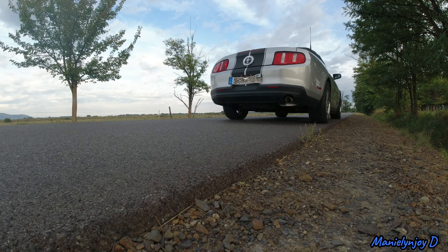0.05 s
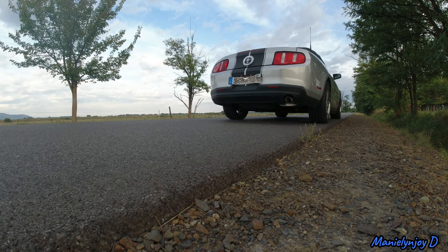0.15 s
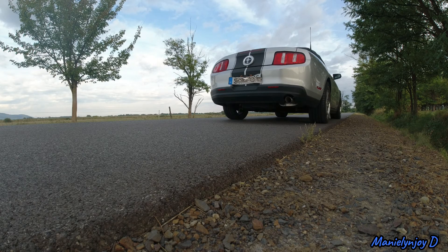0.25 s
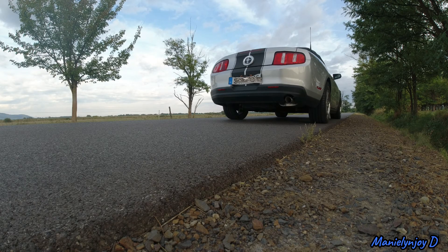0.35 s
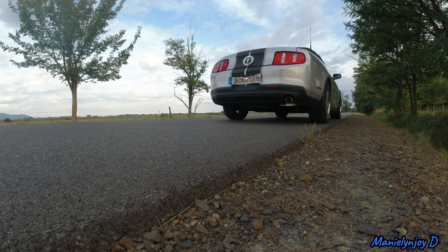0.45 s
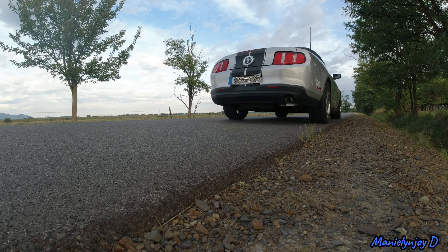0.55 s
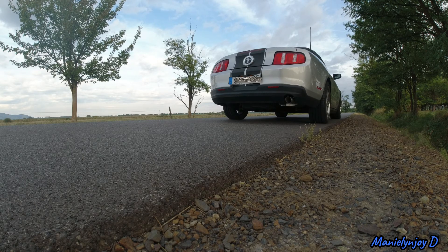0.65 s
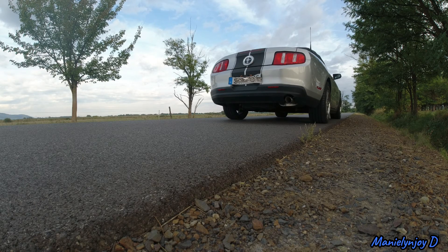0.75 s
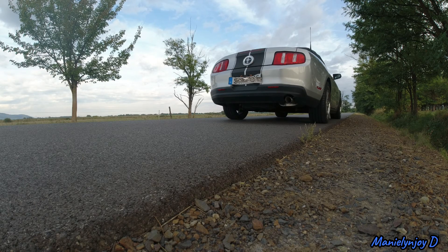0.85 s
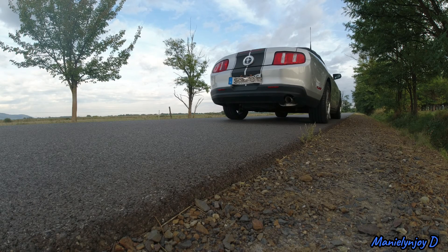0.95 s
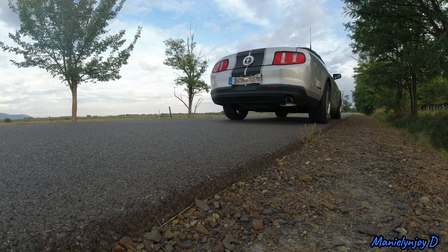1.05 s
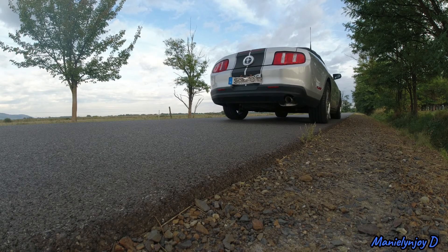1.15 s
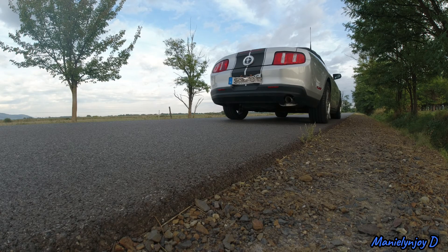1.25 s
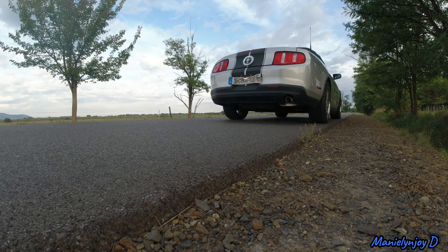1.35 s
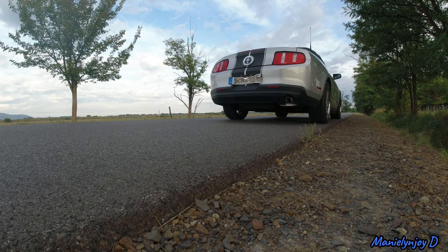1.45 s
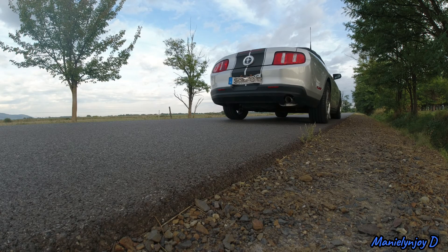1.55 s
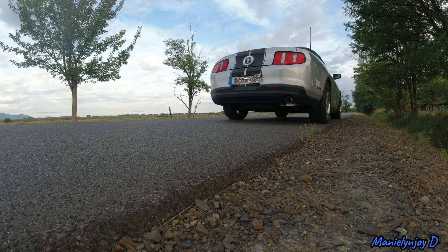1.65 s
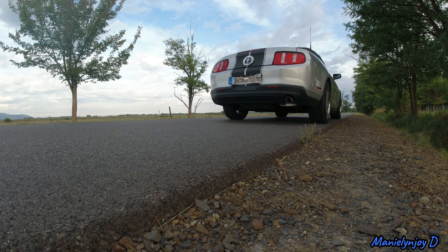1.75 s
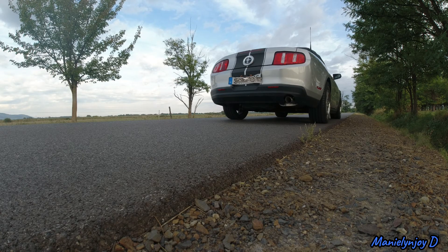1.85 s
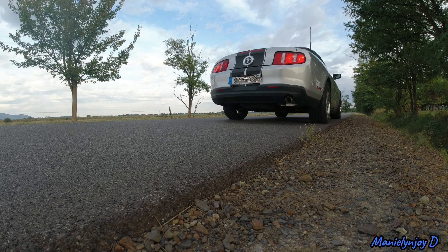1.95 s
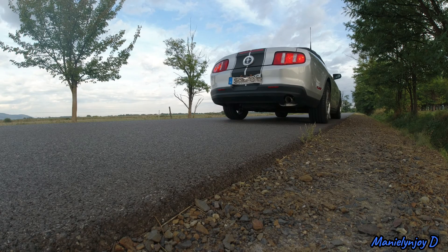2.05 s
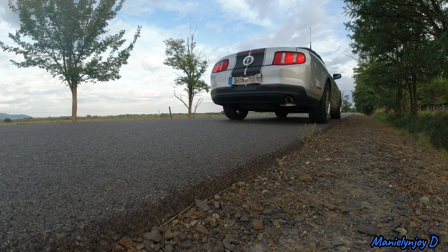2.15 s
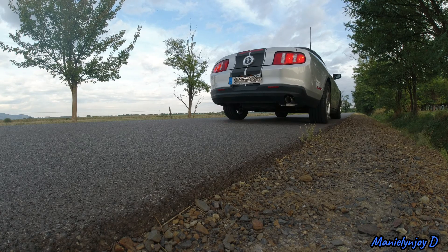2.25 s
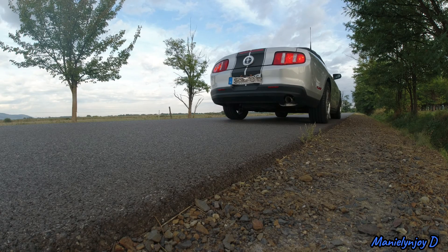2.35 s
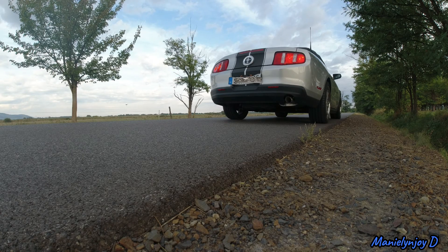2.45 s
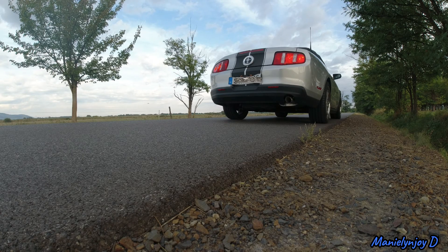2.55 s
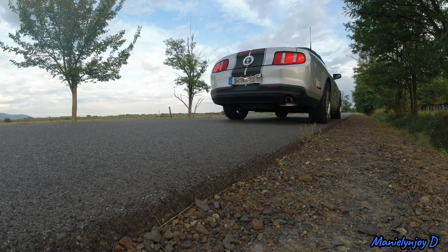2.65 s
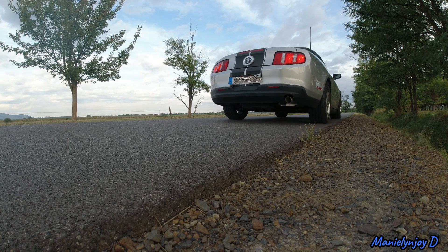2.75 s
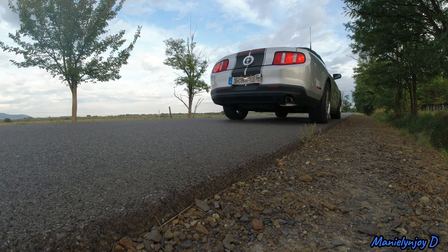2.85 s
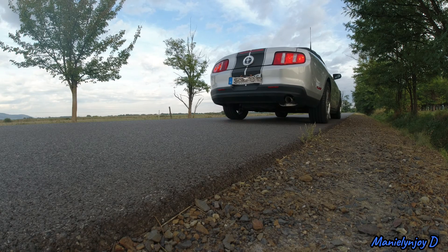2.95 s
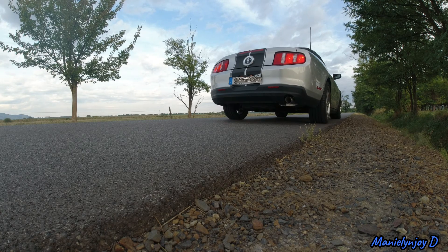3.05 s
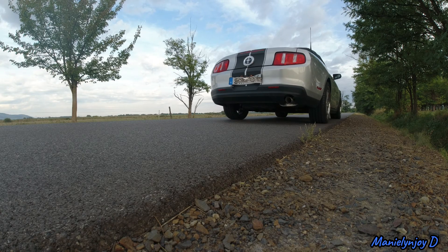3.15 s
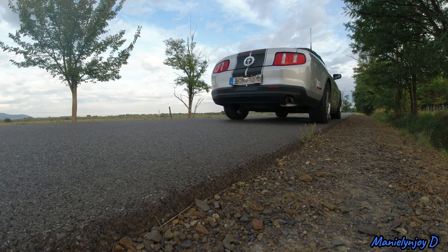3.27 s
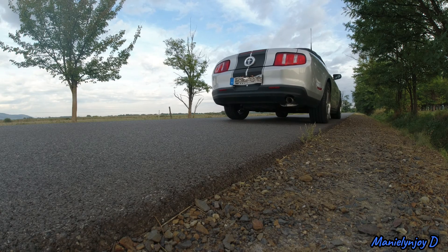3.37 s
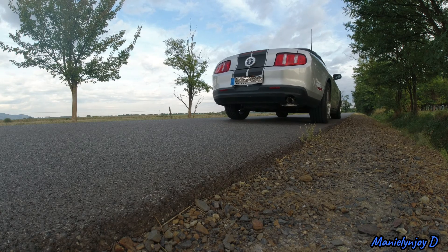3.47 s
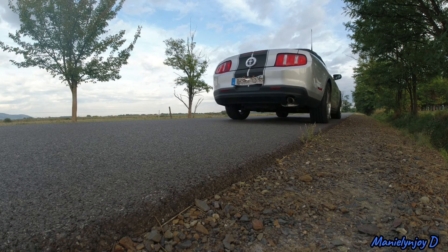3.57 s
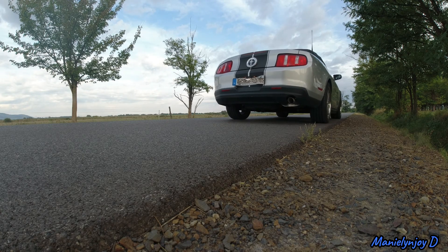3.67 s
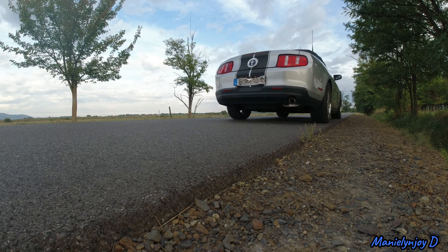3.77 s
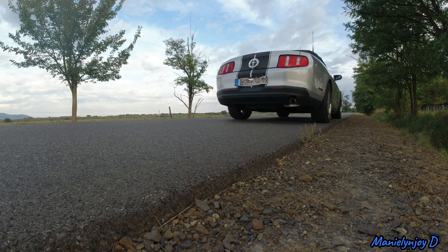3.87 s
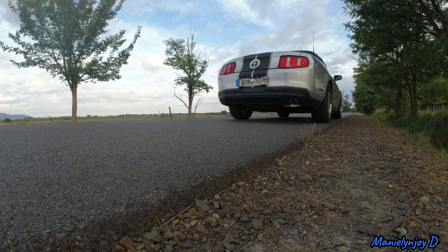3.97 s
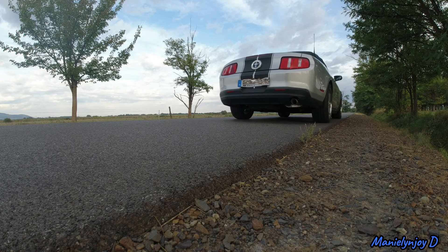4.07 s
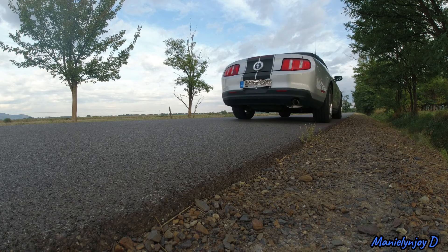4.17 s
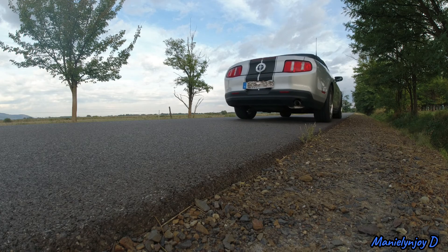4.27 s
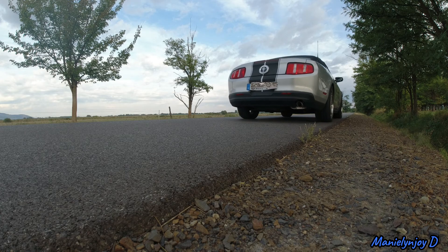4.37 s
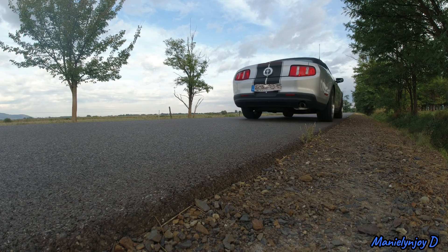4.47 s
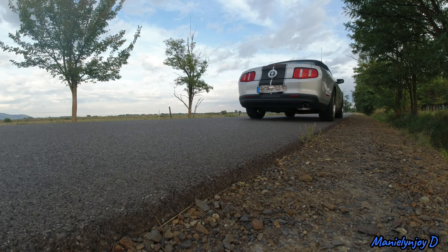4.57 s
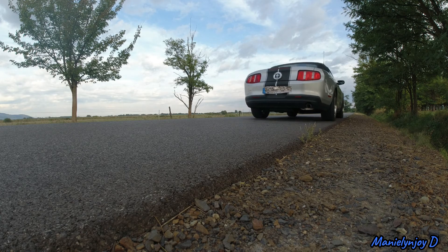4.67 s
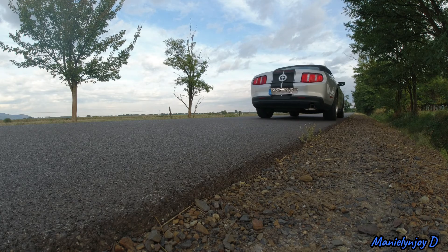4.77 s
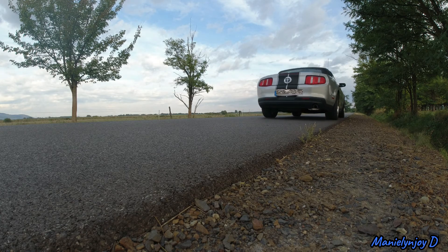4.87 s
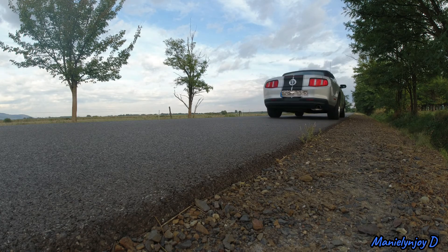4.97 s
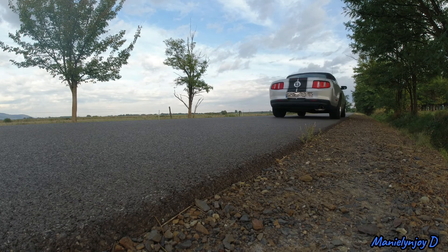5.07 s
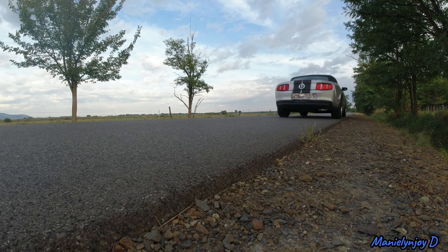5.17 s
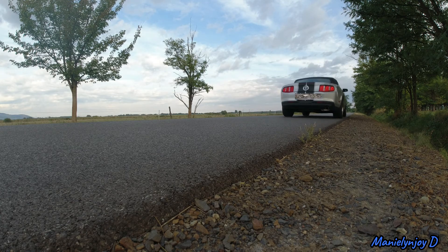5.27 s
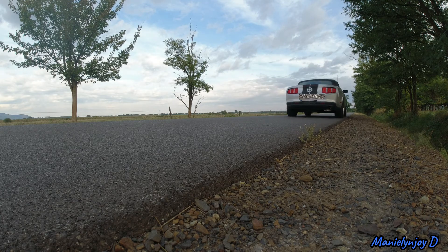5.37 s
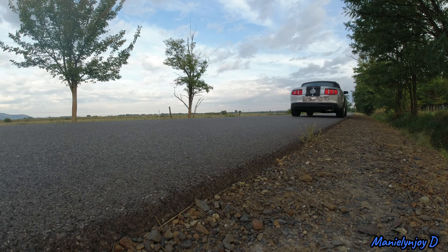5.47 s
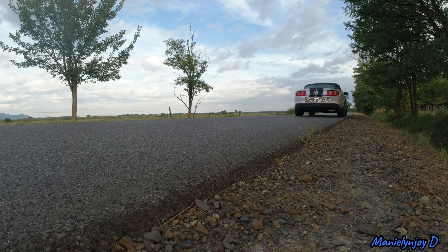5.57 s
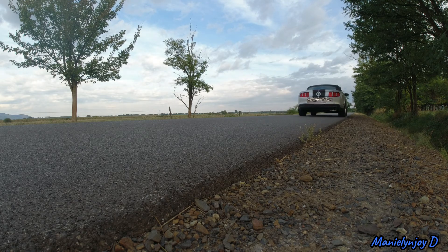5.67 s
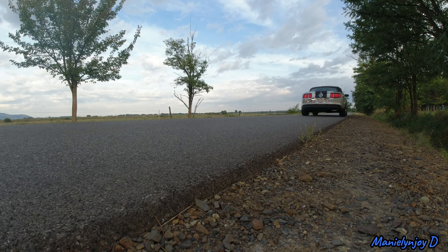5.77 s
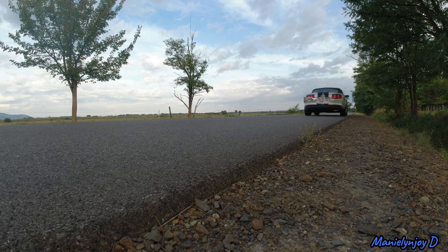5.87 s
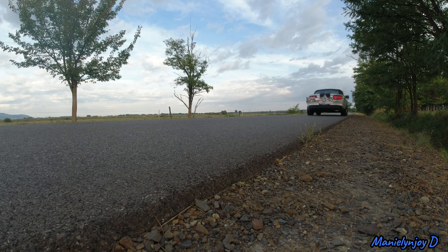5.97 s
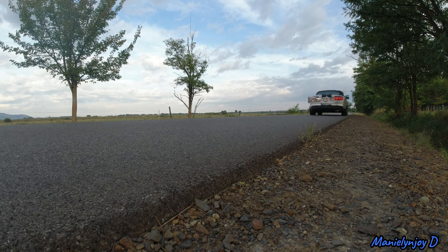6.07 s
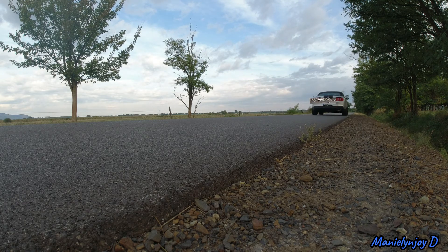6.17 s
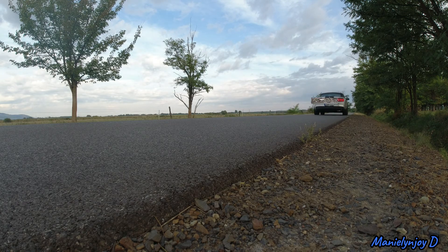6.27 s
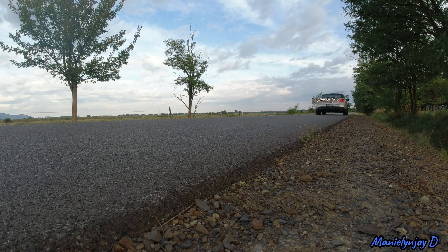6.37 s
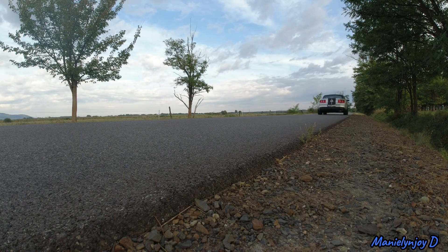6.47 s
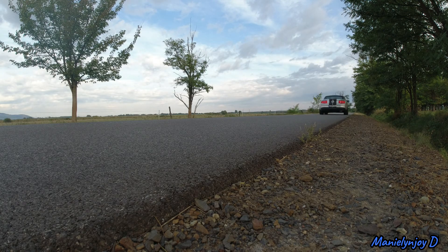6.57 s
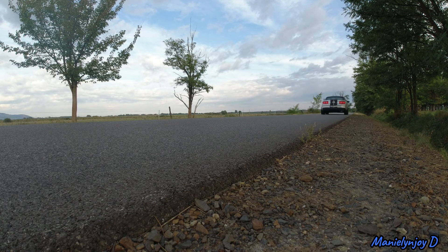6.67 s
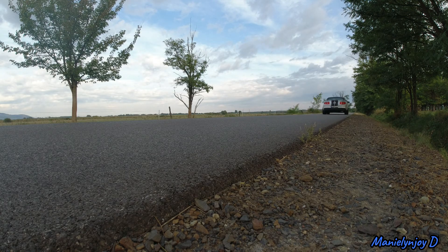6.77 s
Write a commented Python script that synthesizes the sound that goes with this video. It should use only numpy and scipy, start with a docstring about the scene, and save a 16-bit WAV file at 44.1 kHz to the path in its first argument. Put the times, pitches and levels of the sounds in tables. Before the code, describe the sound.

A car with an open exhaust winds down from high revs with sharp pops and a burble, close by on a quiet country road. It idles softly with a light clatter, a tick and a faint fan rush, then knocks into gear. Suddenly the throttle opens and the car drives away from the microphone, its loud drone rising in pitch and slowly fading over a light hiss of tyres on grit.

```python
"""A six-cylinder car with an open exhaust, from the roadside 4 m behind it, on two close microphone ports.
First the engine falls from a rev, its firings droning and rasping while unburnt fuel pops in the pipe.
At 2 s it settles to a clattering idle and a relay starts the cooling fan; at 3 s it clunks into gear.
At 4 s the throttle opens and it pulls away hard, tyres hissing and crunching over grit.
A treble rustle, short scrapes and two thin squeals come and go over faint outdoor air."""
import sys
import numpy as np
from scipy import signal
from scipy.io import wavfile
from scipy.ndimage import uniform_filter1d

SR = 44100
rng = np.random.default_rng(int(sys.argv[2]) if len(sys.argv) > 2 else 0)


def master_out(mix):
    """Clip the mix to full scale and print it as 16-bit PCM to the path in sys.argv[1]."""
    frames = np.transpose(np.atleast_2d(mix))
    ceiling = np.clip(frames, -1, 1)
    pcm = np.round(ceiling * 32767).astype(np.int16)
    wavfile.write(sys.argv[1], SR, pcm)


N = 301203
TIME = np.arange(N) / SR


def gain_of(db):
    """Decibels to a factor."""
    return 10 ** (np.asarray(db) / 20)


def unit_rms(x):
    """Scales to rms 1."""
    return x / np.sqrt(np.mean(x ** 2) + 1e-20)


def over_time(rows):
    """One curve for each column after the time."""
    times, *columns = np.transpose(rows)
    return [np.interp(TIME, times, column) for column in columns]


def at_hz(points, hz):
    """Reads a spectrum on a log-frequency axis."""
    f, value = np.transpose(points)
    return np.interp(np.log(hz + 1), np.log(f + 1), value)


def coloured(x, points, size=8192):
    """Causal filter: the phase follows from the log gain, so clicks keep a sharp front."""
    db = np.maximum(at_hz(points, abs(np.fft.fftfreq(size, 1 / SR))), -100)
    response = np.exp(np.conj(signal.hilbert(np.log(gain_of(db)))))
    taps = np.fft.ifft(response).real[:size // 2]
    return signal.oaconvolve(x, taps)[:len(x)]


def levelled(x, seconds):
    """Divides out the slow level, so that a curve can set it."""
    return x / np.sqrt(uniform_filter1d(x ** 2, round(seconds * SR)) + 1e-20)


def drift(seconds):
    """A smooth random wander of rms 1."""
    size = round(seconds * SR)
    return unit_rms(uniform_filter1d(uniform_filter1d(rng.standard_normal(N), size), size))


def decaying(hits, seconds):
    """Gives each impulse an exponential tail."""
    return signal.lfilter([1], [1, -np.exp(-1 / (seconds * SR))], hits)


def placed(rows, sound):
    """Lays one sound at each (time [s], level [dB])."""
    hits = np.zeros(N)
    for s, db in rows:
        hits[round(s * SR)] = gain_of(db)
    return signal.oaconvolve(hits, sound)[:N]


def ring(modes, seconds):
    """Dying sines, one for each mode."""
    t = np.arange(round(seconds * SR)) / SR
    return sum(gain_of(db - 60 * t / t60) * np.sin(2 * np.pi * hz * t) for hz, db, t60 in modes)


# nulls behind the two tailpipes: (multiple [x firing rate], firing rate [Hz], width [Hz])
PIPE_NULLS = [(2, 127, 5), (3, 71, 6), (3, 123, 5), (4, 68, 10), (4, 99, 9), (5, 126, 4), (6, 126, 4)]

def tailpipes(multiple, rate):
    """Signed share left of a tone: the two pipes cancel it at some engine speeds and turn it over."""
    share = np.ones(N)
    for k, null_hz, width in PIPE_NULLS:
        if k == multiple:
            share *= np.tanh((rate - null_hz) / width) * np.sign(110 - null_hz)  # upright at 110 Hz
    return share


# the exhaust's tones, one entry each: (multiple [x firing rate]); their delay in the pipe: (lag [rad])
TONE_MULTIPLES = [.5, 1, 1.5, 2, 2.5, 3, 4, 5, 6, 7]
TONE_LAGS = [.4, -.4, 1.3, 2.3, 2.2, 2.5, 3.2, 5.1, 6.5, 7.9]
# each tone entering the pipe on overrun, at idle and under load: (level [dB])
TONES_OVERRUN = [3, 0.5, -10, -1, -13, -20.5, -34, -37.5, -44, -36]
TONES_IDLE = [7, 5, -9, 5, -10, 6.4, -2, -9, -17, -0.5]
TONES_LOADED = [-17.5, 2.24, -32.5, -4, -19, -8.5, -24, -22, -31.5, -32]
# what the pipe passes of a steady tone: (frequency [Hz], gain [dB])
PIPE_RESPONSE = [(25, -34), (40, -15), (55, -9), (70, -6), (85, -3.3), (110, -2.1), (160, 1.5), (190, -4.5),
                 (220, -7), (265, -8), (300, -12), (328, -3), (400, -6), (440, -2), (530, -2.5), (700, -3),
                 (1000, -21.5)]

def drone(rate, cycles, load, turbulence, drone_db, rasp_db, idle_hz=38.8, overrun_hz=82):
    """Regular firings sound multiples of their rate through the pipe; turbulence makes each waver."""
    coasting = np.clip(np.log(rate / idle_hz) / np.log(overrun_hz / idle_hz), 0, 1)  # 0: fuel is back
    flow = np.maximum(load, coasting)  # at idle the pipes barely meet
    bright_db = .5 * (rasp_db - drone_db + 6.5)  # tones above 213 Hz follow the rasp as it stands out
    out = np.zeros(N)
    for k, lag, overrun, idle, loaded in zip(TONE_MULTIPLES, TONE_LAGS,
                                             TONES_OVERRUN, TONES_IDLE, TONES_LOADED):
        source_db = load * loaded + (1 - load) * (coasting * overrun + (1 - coasting) * idle)
        db = drone_db + source_db + at_hz(PIPE_RESPONSE, k * rate)
        db += bright_db * np.clip(np.log2(k * rate / 213), 0, 1)
        db += 2 * turbulence * drift(.017)
        share = 1 - flow + flow * tailpipes(k, rate)
        out += np.sqrt(2) * gain_of(db) * share * np.cos(2 * np.pi * k * cycles - lag)
    return out


# how much stronger or weaker each cylinder fires: (departure [share])
CYLINDER_BIAS = [0.85, 0.18, 0.76, -0.47, 0.52, 0.31]
# firings from overrun through idle to load: (time [s], even part, pattern, chance, turbulence [relative])
FIRING_CHARACTER = [(0, 0, .6, .9, .7), (1.2, 0, .5, .6, .7), (2, -.45, .2, .45, 1.1),
                    (3.9, -.45, .2, .45, 1.1), (4.3, 0, .7, .25, .3), (4.75, 0, .8, .25, .35),
                    (5.1, 0, 1.1, .18, .35), (6.4, 0, 1.0, .15, .35), (6.55, 0, 1.0, .15, .22),
                    (6.83, 0, 1.0, .15, .22)]

def firings(cycles, scatter_s=.0005):
    """No two cylinders fire alike: gives their uneven pulses, their sharp fronts and the turbulence."""
    even, patterned, luck, turbulence = over_time(FIRING_CHARACTER)
    fired = 1 + np.flatnonzero(np.diff(np.floor(cycles)))
    cylinder = np.floor(cycles[fired]).astype(int) % len(CYLINDER_BIAS)
    pattern = patterned[fired] * np.array(CYLINDER_BIAS)[cylinder]
    size_luck, front_luck, time_luck = luck[fired] * np.clip(rng.standard_normal((len(fired), 3)), -2, 2).T
    pulses, fronts = np.zeros((2, N))
    pulses[fired] = even[fired] + pattern + size_luck  # the even part is a short suck at idle
    # fronts leave the pipes a little early or late, which blurs the upper multiples
    delay = np.round(scatter_s * SR * (time_luck + pattern / 3)).astype(int)
    fronts[np.clip(fired + delay, 0, N - 1)] = gain_of(13 * pattern + 7.5 * front_luck)
    return pulses, fronts, turbulence


# uneven firings at the pipe mouth: (frequency [Hz], gain [dB])
BURBLE_COLOUR = [(20, -31.5), (45, -9), (70, -5.5), (110, 2.5), (150, 4), (200, 2), (260, 0), (330, -8),
                 (420, -22), (700, -50.5), (1500, -100)]

def burble(pulses, turbulence):
    """Uneven pulses boom in the pipe; swirling gas fills the gaps."""
    swirl = .6 * turbulence * rng.standard_normal(N)
    return levelled(coloured(levelled(pulses, .2) + swirl, BURBLE_COLOUR), .3)


# the firings' fronts at the pipe mouth: (frequency [Hz], gain [dB])
RASP_COLOUR = [(80, -41), (160, 9.5), (250, 6.5), (340, 1), (420, 1), (550, -4.5), (700, -7.5), (950, -22),
               (1500, -27), (2300, -50.5), (5000, -100)]

def rasp(fronts, turbulence):
    """Sharp pressure fronts bark out of the open pipe amid swirling gas."""
    swirl = turbulence * rng.standard_normal(N)
    return levelled(coloured(levelled(fronts, .2) + swirl, RASP_COLOUR), .3)


# valves and intake from behind the car, then with open throttle and tyres: (frequency [Hz], gain [dB])
CLATTER_COLOUR = [(250, -29.5), (500, -1.5), (900, -3.5), (1300, -7), (1750, -10), (2100, -14),
                  (2500, -15.5), (2900, -15.5), (3300, -19.5), (5200, -27.5), (6000, -33), (8500, -38),
                  (15500, -50)]
DRIVING_COLOUR = [(250, -30.5), (500, -0.5), (900, -3), (1500, -4.5), (2000, -12.5), (2600, -15.5),
                  (3800, -22), (5200, -25.5), (8500, -38), (15500, -53)]

def clatter(rate, load, fronts, turbulence, moves_s=3.625, start_m=4.06, pull_m_per_s2=3.46):
    """Valve, intake and road hiss throbs with the firings, grows with revs and fades with distance."""
    metres = start_m + .5 * pull_m_per_s2 * np.maximum(TIME - moves_s, 0) ** 2
    db = -49.5 + 11.5 * np.log2(rate / 100) + 8.5 * load - 20 * np.log10(metres / start_m)
    puffs = levelled(decaying(fronts, .0047), .84)
    throb = .8 + .2 * puffs / (1 + turbulence)
    rattle = throb * rng.standard_normal(N)
    hiss = (1 - load) * coloured(rattle, CLATTER_COLOUR) + load * coloured(rattle, DRIVING_COLOUR)
    return levelled(hiss, .49) * gain_of(db + 1.2 * drift(.035))


# the exhaust from the roadside: (time [s], drone gain [dB], burble gain [dB], rasp gain [dB])
EXHAUST_GAINS = [(0.0, -13.5, -37, -33), (0.12, -21.5, -23, -55), (0.24, -23.5, -21, -34),
                 (0.45, -28.5, -20.5, -34), (0.65, -27.5, -23.5, -37), (0.8, -27, -27, -38),
                 (0.949, -30, -28.5, -47.5), (1.099, -28, -38, -48), (1.321, -34, -40.5, -67),
                 (1.6, -37, -42.5, -70), (1.92, -49, -52.5, -77), (2.05, -50.5, -60, -50.5),
                 (3.0, -50.5, -54.5, -47.5), (3.962, -54, -43.5, -49.5), (3.989, -19, -33, -41.5),
                 (4.018, -11, -56, -45), (4.202, -12.5, -25, -38.5), (4.351, -13.5, -28.5, -33),
                 (4.401, -10, -28.5, -22), (4.52, -9, -23, -23), (4.7, -11.5, -21, -24),
                 (5.03, -13.5, -23.5, -26.5), (5.45, -15.5, -29, -27.5), (5.73, -19, -25, -28.5),
                 (6.0, -21, -27, -34), (6.431, -23.5, -26, -31), (6.56, -23.5, -25.5, -26.5),
                 (6.83, -24, -27, -26)]
# engine speed: (time [s], firing rate [Hz])
FIRING_RATE = [(0.0, 162.0), (0.12, 152.5), (0.24, 139.5), (0.6, 111.8), (0.72, 105.0), (0.84, 93.5),
               (1.08, 77.2), (1.32, 62.8), (1.56, 52.1), (1.92, 40.2), (2.1, 35.4), (2.4, 33.0),
               (3.94, 33.5), (4.02, 38.4), (4.23, 61.3), (4.44, 90.1), (4.51, 95.8), (4.58, 98.5),
               (4.66, 100.6), (4.9, 100.7), (5.03, 101.9), (5.31, 107.0), (6.01, 115.5), (6.29, 120.7),
               (6.43, 124.4), (6.57, 131.1), (6.71, 134.4), (6.83, 136.8)]

def engine(throttle_s=3.972, opening_s=.03):
    """One train of firings drives the drone, burble, rasp and clatter."""
    drone_db, burble_db, rasp_db = over_time(EXHAUST_GAINS)
    rate, = over_time(FIRING_RATE)
    load = np.clip((TIME - throttle_s) / opening_s, 0, 1)
    cycles = np.cumsum(rate) / SR
    cycles -= cycles[round(5.195 * SR)]  # the first cylinder fires at this moment
    pulses, fronts, turbulence = firings(cycles)
    return (drone(rate, cycles, load, turbulence, drone_db, rasp_db)
            + gain_of(burble_db - 2.5) * burble(pulses, turbulence)
            + gain_of(rasp_db) * rasp(fronts, turbulence)
            + clatter(rate, load, fronts, turbulence))


# pops at the tailpipe as the revs fall: (time of crest [s], peak level [dB])
FUEL_POPS = [(.0045, -8), (.0169, -7), (.0885, -14), (.1338, -1), (.146, -7), (.1955, -5), (.2083, -3.5),
             (.245, -10), (.29, -17), (.387, -7), (.402, -14), (.463, -18), (.726, -15), (.812, -23)]
# the pipe's ring after a pop: (frequency [Hz], level [dB], t60 [s])
PIPE_MODES = [(164, -18, 0.032), (86.4, -15, 0.095), (220, -15.5, 0.054)]

def pops(rise_s=.00145):
    """Unburnt fuel goes off in the pipe: a rounded push, a steep fall into a longer pull, then a ring."""
    age = np.arange(SR // 8) / SR / rise_s
    age = np.where(age < 1, age, 1 + 1.3 * (age - 1))  # falls faster than it rises
    late = 1 - np.exp(-(age / 2) ** 4)
    push = np.sin(np.pi * np.minimum(age, 2) / 2) ** 4
    pull = .5 * np.exp(-((age - 2.6) / 2.1) ** 2)
    mouth = signal.butter(2, 55.6, "high", fs=SR)  # the pipe mouth sheds little bass
    pop = signal.lfilter(*mouth, push + late * (ring(PIPE_MODES, 1 / 8) - pull))
    return placed([(s - rise_s, db) for s, db in FUEL_POPS], pop / pop.max())


# gusts of airy rustle: (time [s], length [s], level [dB]); their colour: (frequency [Hz], gain [dB])
RUSTLE_GUSTS = [(0.0, 0.36, -63), (0.252, .2, -60), (0.39, 0.3, -57), (0.532, 0.26, -55.5),
                (0.723, 0.22, -56.5), (0.836, 0.27, -69.5), (4.12, 0.81, -64.5), (4.561, 0.28, -66.5),
                (4.65, .8, -66), (5.101, 0.89, -72)]
RUSTLE_SPECTRUM = [(2500, -26.5), (4000, -3), (5200, 3.5), (7000, -1), (10000, 1), (11800, -1.5),
                   (12500, -16), (14000, -19), (15500, -24.5)]

def rustle():
    """A thin treble hiss that flickers and comes in gusts."""
    hiss = gain_of(2.5 * drift(.004)) * rng.standard_normal(N)
    power = sum(placed([(s, db)], signal.windows.tukey(round(length * SR), .8)) ** 2
                for s, length, db in RUSTLE_GUSTS)
    return np.sqrt(power) * unit_rms(coloured(hiss, RUSTLE_SPECTRUM))


# open air at the roadside: (frequency [Hz], gain [dB])
AIR_COLOUR = [(30, 16), (60, 3), (100, -26), (400, -1.5), (900, -3), (1600, -13), (2600, -19), (4500, -32),
              (6000, -45), (8500, -36), (12500, -54.5), (15500, -44)]

def air(level_db=-60.5):
    """Faint outdoor rumble and hiss, wavering slightly."""
    return gain_of(level_db + drift(.028)) * unit_rms(coloured(rng.standard_normal(N), AIR_COLOUR))


# short scrapes from the car's direction: (time [s], length [s], level [dB], centre [Hz], width [Hz])
SCRAPE_EVENTS = [(.485, 0.08, -43, 900, 700), (2.945, 0.075, -60, 3600, 1200),
                 (2.975, 0.075, -50, 450, 600), (2.28, .06, -63, 2200, 3000), (3.25, .06, -64, 2000, 2600)]

def scrapes():
    """Rough noise in one broad resonance, swelling and fading."""
    out = np.zeros(N)
    for s, length, db, hz, width in SCRAPE_EVENTS:
        size = round(length * SR)
        band = signal.butter(2, [hz - width / 2, hz + width / 2], "band", fs=SR)
        rough = rng.standard_normal(SR) * gain_of(2.9 * drift(.00067)[:SR])
        scrape = unit_rms(signal.lfilter(*band, rough)[:size])
        out += placed([(s, db)], scrape * signal.windows.tukey(size, .7))
    return out


# the fan relay, heard as the car idles: (time [s], gain [dB])
RELAY_TICK = [(2.009, -38.5)]

def cooling_fan(rush_db=-57.5):
    """A relay ticks drily and the fan comes on with a steady rush."""
    tick = ring([(600, -5, .0091), (1170, -5, .011), (2500, -6.5, .0028),
                 (5000, -3, .0012), (9000, -16, .002)], .02)
    running = TIME > RELAY_TICK[0][0]
    rush = unit_rms(coloured(rng.standard_normal(N), CLATTER_COLOUR))
    return placed(RELAY_TICK, tick) + gain_of(rush_db) * rush * running


# squeals, barely audible at the roadside: (time [s], length [s], level [dB], frequency [Hz])
SQUEAL_EVENTS = [(2.53, .97, -84, 5360), (4.05, .13, -74, 5860)]

def squeals():
    """Thin tones, as of brakes, that waver in strength."""
    out = np.zeros(N)
    for s, length, db, hz in SQUEAL_EVENTS:
        t = np.arange(round(length * SR)) / SR
        out += placed([(s, db)], np.sin(2 * np.pi * hz * t) * signal.windows.tukey(len(t), .3))
    return np.sqrt(2) * out * gain_of(2 * drift(.03))


# the gear going in, a few metres off: (time [s], peak level [dB])
SHIFT_KNOCKS = [(2.957, -47), (2.979, -33), (2.987, -42), (3.001, -47), (3.013, -48)]
# the gearbox's ring: (frequency [Hz], level [dB], t60 [s])
GEARBOX_MODES = [(543, 6, 0.28), (802, 13, 0.078), (1230, -19, 0.045), (1714, 9, 0.04), (2140, 6, 0.044),
                 (3330, -1.5, 0.14), (3910, 0, 0.033)]

def gear_shift(blow_s=.00033):
    """Short knocks ring the gearbox; each blow takes a moment to build."""
    body = ring(GEARBOX_MODES, .1)
    body *= 1 - np.exp(-TIME[:len(body)] / blow_s)
    return placed(SHIFT_KNOCKS, body / abs(body).max())


# road grit as the car leaves: (time [s], level [dB]); its colour: (frequency [Hz], gain [dB])
GRIT_LEVEL = [(4.04, -100), (4.09, -68.5), (4.3, -65.5), (4.4, -63), (4.73, -61), (4.86, -66.5),
              (4.95, -82), (6.4, -74.5), (6.78, -70)]
GRIT_SPECTRUM = [(2500, -27), (3800, -5), (4500, 6), (5200, 3.5), (5800, -17), (7000, -24), (12000, -69)]

def grit(crunches_per_s=150, bed=.7):
    """The tyres crush grit: short crunches of unequal size over a bed of finer ones."""
    sizes = gain_of(2.5 * np.minimum(rng.exponential(1, N), 4))
    hits = sizes * (rng.random(N) < crunches_per_s / SR)
    bursts = unit_rms(decaying(hits, .00084))
    crunch = coloured((bursts + bed) * rng.standard_normal(N), GRIT_SPECTRUM)
    db = np.interp(TIME, *np.transpose(GRIT_LEVEL), left=-200)
    return gain_of(db) * unit_rms(crunch)


# how alike the two microphone ports hear the car: (frequency [Hz], likeness [0-1])
PORT_LIKENESS = [(25, 0.99), (80, 1), (300, 1), (1000, 0.95), (2500, 1), (5000, 0.6), (8000, 0),
                 (12000, 0.1)]

def microphone_ports(x, left_lag_s=6e-5):
    """Sound reaches the left port later; a scattered share, shifting with the air, differs at each."""
    hz, _, spectra = signal.stft(x, SR, nperseg=1024, noverlap=768)
    likeness = np.clip(at_hz(PORT_LIKENESS, hz), 0, 1)[:, None]
    delays = left_lag_s * np.array([.5, -.5])[:, None, None]
    direct = np.exp(-2j * np.pi * hz[:, None] * delays)
    # doubled, since random phases lose half their size on overlap
    scattered = 2 * np.exp(2j * np.pi * rng.random((2,) + spectra.shape))
    paths = np.sqrt(likeness) * direct + np.sqrt(1 - likeness) * scattered
    return signal.istft(spectra * paths, SR, nperseg=1024, noverlap=768)[1][:, :N]


def scene():
    """Everything reaches the microphone from the car's direction."""
    return microphone_ports(engine() + pops() + rustle() + air() + scrapes()
                            + cooling_fan() + squeals() + gear_shift() + grit())


def record(dry, knee=.7, ceiling=.93, edge_hz=15700):
    """The microphone input rounds off peaks above the knee, then cuts the highest treble."""
    room = ceiling - knee
    squashed = np.sign(dry) * (knee + room * np.tanh((abs(dry) - knee) / room))
    rounded = np.where(abs(dry) > knee, squashed, dry)
    lowpass = signal.firwin(511, edge_hz, window=("kaiser", 9), fs=SR)
    return signal.oaconvolve(rounded, lowpass[None], "same")


dry = scene()
out = record(dry)
master_out(out)
```